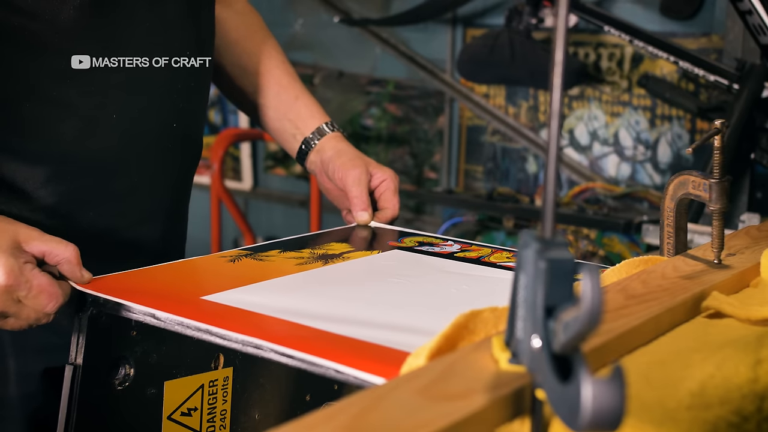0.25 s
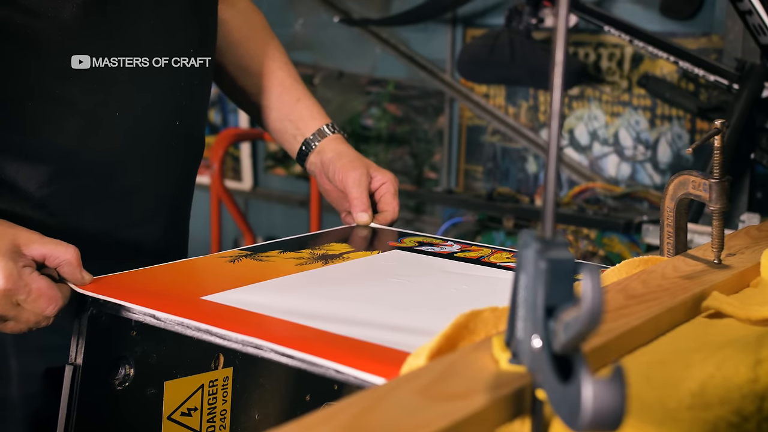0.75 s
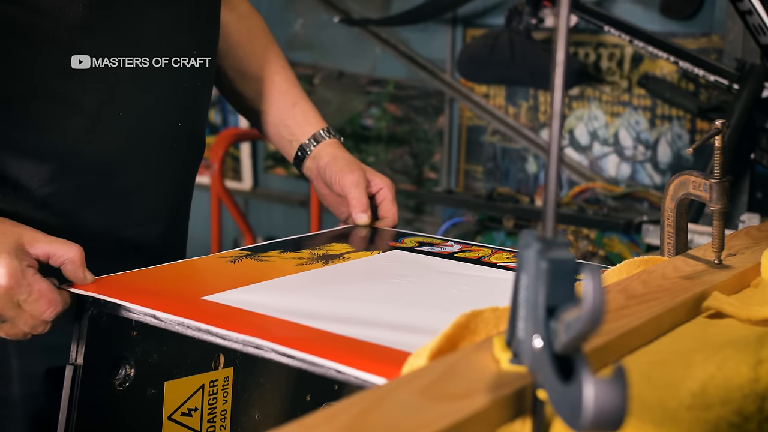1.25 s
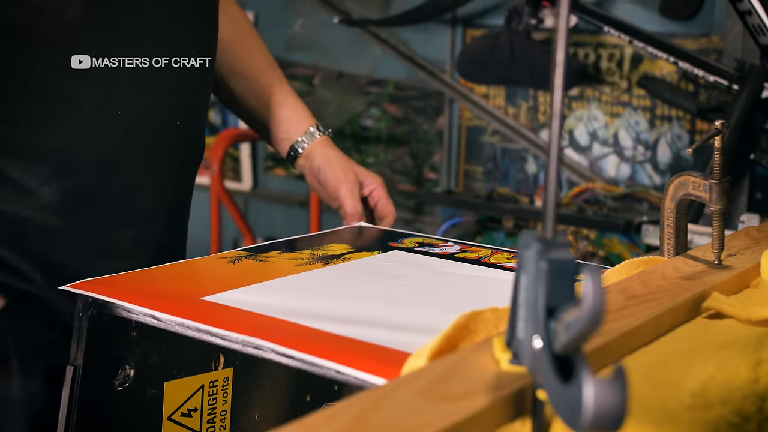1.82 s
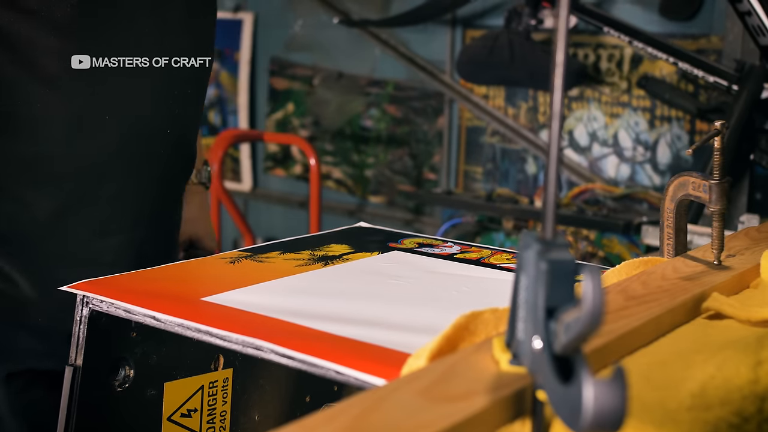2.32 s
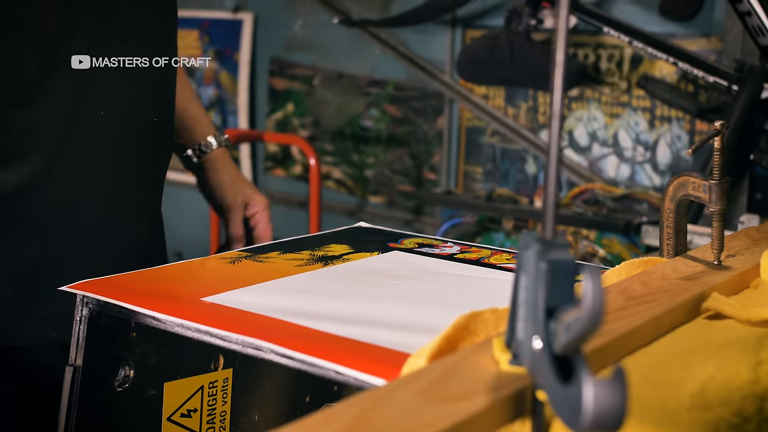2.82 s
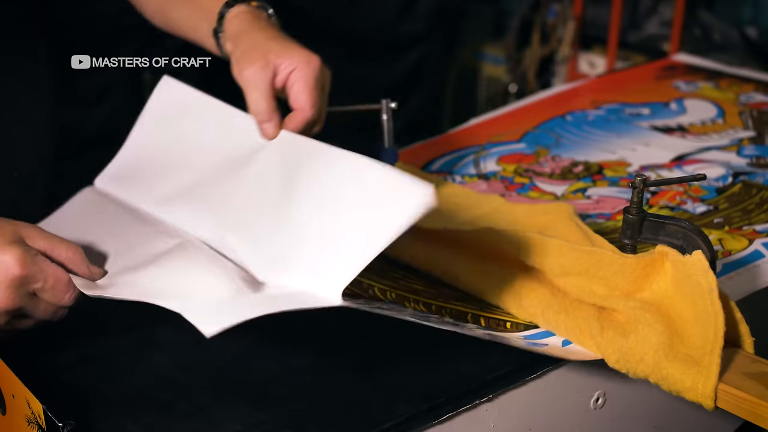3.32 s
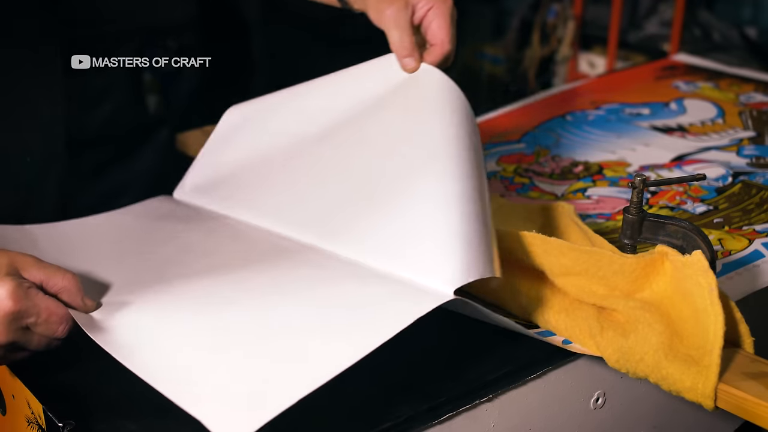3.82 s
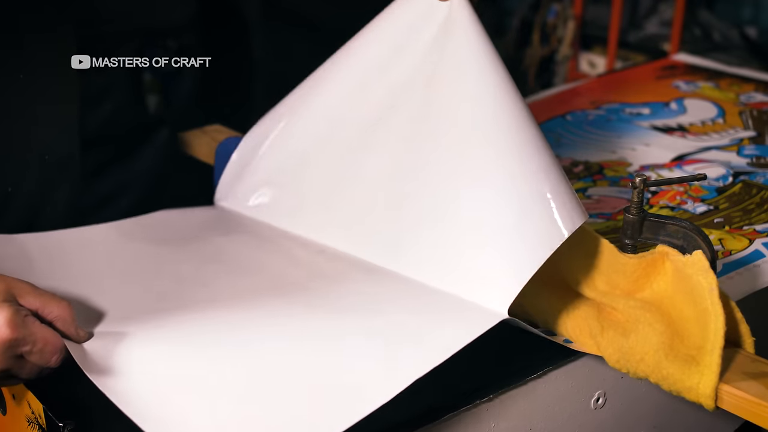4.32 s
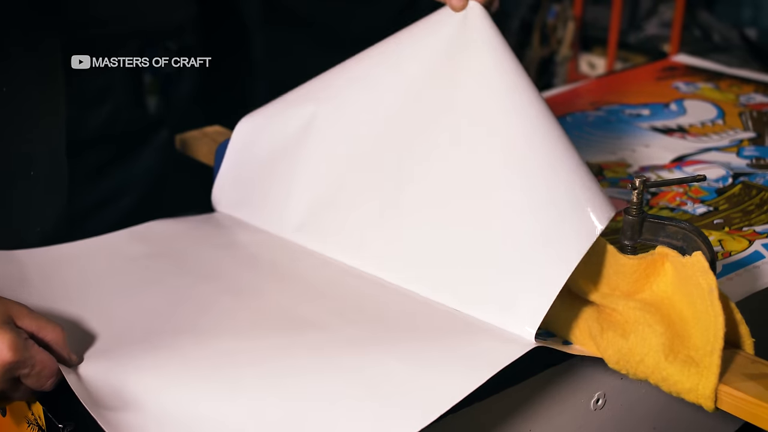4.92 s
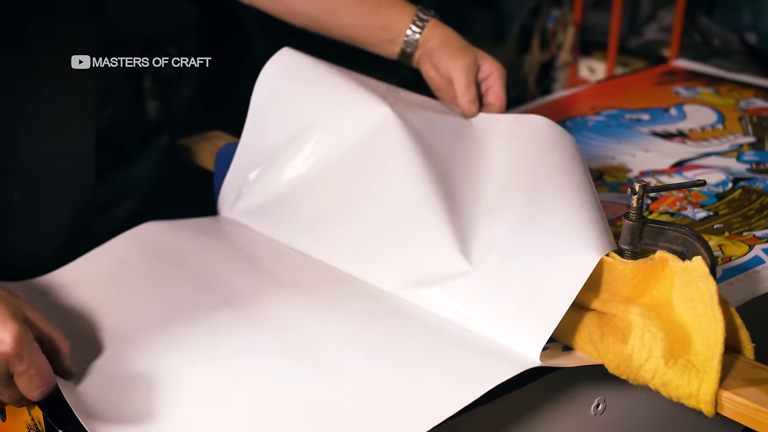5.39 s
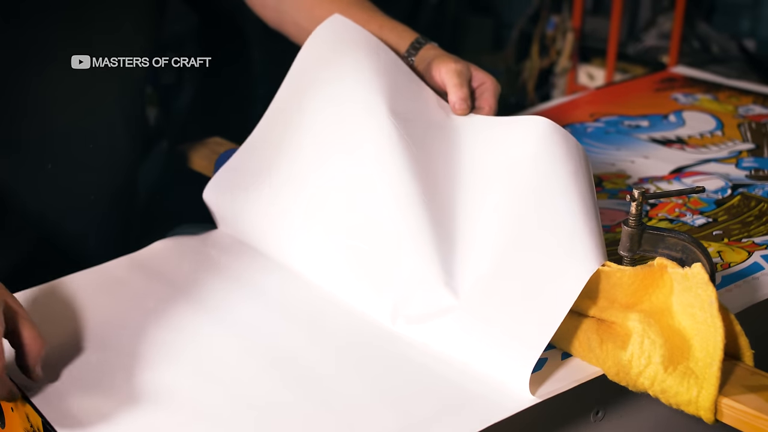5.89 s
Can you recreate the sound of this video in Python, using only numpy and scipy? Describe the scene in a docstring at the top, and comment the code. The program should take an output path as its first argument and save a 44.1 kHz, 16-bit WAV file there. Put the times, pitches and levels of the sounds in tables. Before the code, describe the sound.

In a small workshop, leaking air hisses with two tiny taps, then cuts to sharp paper creases, dull flaps and fading soft rustles.

```python
"""Stiff backing paper is pulled off a vinyl sheet in a small workshop, heard in mono through one microphone.
Before that, at a first spot, an air line hisses (echo-combed noise) over humming machines and something taps twice.
At the second spot creases snap, flaps buckle and ticks scatter: short noise bursts with a bench echo and a room tail,
lifted by the modes of the sheet. The rustle is grainy noise in two bands, the flexing sheet a low fluttering noise."""
import sys
import numpy as np
from scipy import signal
from scipy.fft import rfft, irfft
from scipy.io import wavfile
from scipy.ndimage import uniform_filter1d

SR = 44100
rng = np.random.default_rng(int(sys.argv[2]) if len(sys.argv) > 2 else 0)


def master_out(mix):
    """Clip the mix to full scale and print it as 16-bit PCM to the path in sys.argv[1]."""
    frames = np.transpose(np.atleast_2d(mix))
    ceiling = np.clip(frames, -1, 1)
    pcm = np.round(ceiling * 32767).astype(np.int16)
    wavfile.write(sys.argv[1], SR, pcm)


N = 271215
T = np.arange(N) / SR  # time [s]


def undb(db):
    """Decibels to amplitude."""
    return 10 ** (np.asarray(db) / 20)


def level(x, db):
    """Scale a sound to an RMS level [dB]."""
    return x * undb(db) / np.sqrt(np.mean(x ** 2))


def band(x, lo_hz, hi_hz, order=2):
    """Causal band-pass."""
    sos = signal.butter(order, [lo_hz, min(hi_hz, .45 * SR)], "band", fs=SR, output="sos")
    return signal.sosfilt(sos, x)


def colour(x, table, peaks=()):
    """Shape the spectrum by (frequency, level) points and add resonances (frequency, width, level)."""
    hz = np.maximum(np.arange(len(x) // 2 + 1) * SR / len(x), 1)
    table_hz, table_db = np.transpose(table)
    gain = undb(np.interp(np.log(hz), np.log(table_hz), table_db))
    lift = 1 + sum(undb(db) / (1 + (2 * (hz - f) / w) ** 2) for f, w, db in peaks)
    return irfft(rfft(x) * gain * lift, len(x))


def walk(rate):
    """Slow random wander: levels held 1 / rate s and smoothed twice, with a spread of about a third."""
    hold = int(SR / rate)
    steps = np.repeat(rng.standard_normal(N // hold + 1), hold)
    return 0.443 * uniform_filter1d(uniform_filter1d(steps, hold), hold)[:N]


def decay(t60, size):
    """Exponential decay that falls 60 dB in t60 seconds."""
    return np.exp(-np.log(1000) * np.arange(size) / SR / t60)


# air leak at the first spot: (time [s], level [dB])
LEAK = [(0.0, -31.5), (0.04, -33), (2.56, -32.5), (3.19, -34), (3.26, -40), (3.27, -58)]
# spectrum of the hiss: (frequency [Hz], relative level [dB per Hz])
LEAK_COLOUR = [(530, -54), (900, -23.5), (1370, -16), (1470, -18.5), (1870, -13), (2340, -17),
               (2770, -10.5), (3560, -6), (4310, -4), (5290, -6), (6640, -2), (9730, -5), (12400, 0),
               (15100, -10.5), (15700, -3.5)]
# standing waves around the leak: (frequency [Hz], width [Hz], level before the common offset [dB])
LEAK_PEAKS = [(3760, 43, -5), (4270, 87, -4), (5890, 44, -3), (6680, 85, -1), (6900, 29, -3),
              (7110, 42, -2), (7560, 58, -3), (7900, 130, -4), (8140, 160, -3), (9190, 80, -3),
              (9630, 70, -6), (9760, 71, -6), (10000, 58, -6), (10200, 43, -3), (10500, 42, -5),
              (10700, 68, -5), (11000, 42, -2), (11300, 67, -3), (11500, 26, -3), (12500, 63, 0),
              (13000, 30, -2), (13600, 53, -4), (13900, 180, -8), (14600, 120, -9)]
LEAK_PEAK_OFFSET_DB, LEAK_ECHO_T60_S = -3, 0.37


def leak():
    """A smooth jet of air; the echoes of the room comb it into fine fixed ridges."""
    echoes = 0.019 * rng.standard_normal(8192) * decay(LEAK_ECHO_T60_S, size=8192)
    echoes[0] = 1  # direct sound
    jet = signal.fftconvolve(rng.standard_normal(N), echoes)[:N]
    peaks = [(hz, width, db + LEAK_PEAK_OFFSET_DB) for hz, width, db in LEAK_PEAKS]
    hiss = level(colour(jet, LEAK_COLOUR, peaks), 0)
    s, db = np.transpose(LEAK)
    return hiss * undb(np.interp(T, s, db, right=-120) + .5 * walk(6.11))


# machine noise at the first spot: (frequency [Hz], relative level [dB per Hz])
SHOP_1 = [(15, -43), (25, -10), (70, -15), (89, -3.5), (156, -6.5), (234, -6.5), (276, -11), (303, -3.5),
          (377, -6), (406, -8.5), (445, 2.5), (479, -17.5), (596, -4.5), (642, -7), (2000, -14.5),
          (2600, -18), (4400, -120)]
# machine noise at the second spot: (frequency [Hz], relative level [dB per Hz])
SHOP_2 = [(25, -19.5), (60, -11), (130, -8), (250, -7), (400, -3), (700, -9), (1100, -11), (1800, -14.5),
          (2800, -24), (4300, -27.5), (6500, -39.5), (10000, -41), (15700, -39.5)]
SHOP_1_DB, SHOP_2_DB = -55.5, -54  # RMS before the cross-fade; the second also wanders
# humming parts of the machines:
# (frequency [Hz], width [Hz], level at first spot [dB], level at second spot [dB])
HUM = [(51.2, 1.1, -85, -69), (101.2, 4.4, -77.5, -71), (166.2, 21, -65, -72), (187, 5.8, -72.5, -62),
       (348, 8.4, -100, -63.5), (376, 6, -66, -61.5), (455.4, 44.5, -63.5, -69.5), (507, 8.3, -70.5, -70),
       (572, 5.4, -70.5, -78)]
MOVE_S, MOVE_LENGTH_S = 3.2, 0.21  # middle and length of the cross-fade between the spots


def shop():
    """Broad machine noise and wavering hums, cross-faded from one spot to the other."""
    second = np.clip((T - MOVE_S) / MOVE_LENGTH_S + .5, 0, 1)
    noise_1 = level(colour(rng.standard_normal(N), SHOP_1), SHOP_1_DB)
    noise_2 = level(colour(rng.standard_normal(N), SHOP_2), SHOP_2_DB) * undb(1.3 * walk(4.84))
    out = np.sqrt(1 - second) * noise_1 + np.sqrt(second) * noise_2
    for hz, width, db_1, db_2 in HUM:
        rough = level(band(rng.standard_normal(N), hz - width / 2, hz + width / 2, order=1), -3.5)
        drift = 0.145 * width * np.cumsum(walk(4)) / SR  # phase drift [cycles]
        steady = 0.78 * np.sin(2 * np.pi * (hz * T + drift + rng.random()))
        out += level(rough + steady, 0) * undb(db_1 + second * (db_2 - db_1))
    return out


# two faint taps at the first spot: (time [s], ring peak [dB], ring frequency [Hz])
TAPS = [(2.158, -33.5, 1520), (2.186, -45.5, 900)]
TAP_CRACK_DB, TAP_CRACK_HZ, TAP_THUMP_DB = -29.5, 6120, -49
TAP_T60_S, TAP_ROOM_DB = 0.033, 5.5


def taps():
    """Two taps as blows: (s, ring dB, ring Hz, crack dB, crack Hz, thump dB, ring t60 s, room dB)."""
    return [(s, ring, hz, TAP_CRACK_DB, TAP_CRACK_HZ, TAP_THUMP_DB, TAP_T60_S, TAP_ROOM_DB)
            for s, ring, hz in TAPS]


# the whole sheet lifts and flexes with a dull flutter: (time [s], level [dB])
FLEX = [(3.05, -72), (3.13, -56), (3.25, -47), (3.4, -48.5), (3.6, -56), (3.8, -75)]


def flex():
    """Low, fluttering noise of the big sheet bending."""
    s, db = np.transpose(FLEX)
    flutter = band(rng.standard_normal(N), 110, 1040) * undb(2.9 * walk(40))
    return level(flutter, 0) * undb(np.interp(T, s, db, left=-120, right=-120))


def crack_hz(ring_db, crack_db):
    """The crack is higher the fainter the ring and the more the crack leads the ring."""
    return 6120 - 57.5 * ring_db + 98 * (crack_db - ring_db)


# sharp creases letting go, peaks taken before the sheet's modes:
# (time [s], ring peak [dB], ring frequency [Hz], crack peak [dB], thump peak [dB])
CREASES = [(3.267, -11.5, 3100, -14.5, -31.5), (3.278, -23, 2600, -35, -30.5), (3.362, -7, 2700, -14, -44),
           (3.371, -33, 2320, -36, -53), (3.44, -3.5, 2140, -3.5, -35), (3.557, -22.5, 2110, -39, -31),
           (3.572, -28, 2900, -19.5, -39), (3.575, -32, 2280, -24, -35), (3.628, -40, 2250, -38, -58),
           (3.655, -20.5, 2860, -12, -36.5), (3.737, -35, 2020, -24, -37), (3.849, -52, 1910, -32, -43),
           (3.91, -38, 2160, -26, -54), (3.949, -25, 2270, -19.5, -52), (3.98, -17, 1950, -15.5, -29),
           (3.984, -16.5, 1700, -20.5, -36), (4.016, -29, 2340, -25, -56), (4.06, -39, 2850, -24, -39),
           (4.068, -25, 1600, -23, -42), (4.072, -31, 1460, -22, -55), (4.132, -29, 1600, -33, -30.5),
           (4.142, -20.5, 1880, -14.5, -41), (4.155, -24, 1770, -29, -39), (4.167, -27, 2170, -28, -44),
           (4.177, -21, 1510, -17, -56), (4.182, -13.5, 1500, -20, -33), (4.189, -18.5, 1180, -18, -38),
           (4.212, -30, 2150, -20, -34), (4.271, -24, 1970, -22, -58), (4.284, -46, 2020, -25, -47),
           (4.307, -25, 2020, -20, -55), (4.495, -51, 1870, -35.5, -57), (4.568, -38.5, 2280, -34, -54),
           (4.638, -11, 1790, -18, -34), (5.503, -41.5, 3300, -48.5, -62)]
CREASE_T60_S, CREASE_ROOM_DB = 0.0094, -2.5  # ring decay; room tail against the burst


def creases(table=CREASES):
    """Blows of sharp creases letting go, each with a very short ring."""
    return [(s, ring, hz, crack, crack_hz(ring, crack), thump, CREASE_T60_S, CREASE_ROOM_DB)
            for s, ring, hz, crack, thump in table]


# paper sliding and bending on vinyl: (time [s], body level [dB], treble level [dB])
RUSTLE = [(3.27, -40.5, -62), (3.458, -46, -70), (3.71, -58.5, -63), (3.906, -56.5, -62.5),
          (3.992, -58, -50), (4.128, -50, -61), (4.318, -49, -62), (4.38, -61, -71), (4.6, -66, -75),
          (4.908, -72, -82), (5.168, -56, -74), (5.32, -69, -75), (5.39, -62, -73), (5.73, -59, -70),
          (5.77, -63.5, -70), (5.928, -58, -62), (6.008, -57.5, -70), (6.03, -67, -79.5)]


def rustle():
    """Dense tiny slips of paper on vinyl, each with a short tail, in a body band and a treble band."""
    s, body_db, treble_db = np.transpose(RUSTLE)
    slips = undb(2.5 * rng.exponential(size=N)) * (rng.random(N) < .008)
    slip_power = signal.fftconvolve(slips, decay(0.0074, size=1024))[:N].clip(0)
    grain = np.sqrt(1 + 0.14 * slip_power)
    out = 0
    for lo_hz, hi_hz, db in ((900, 3270, body_db), (3940, 9900, treble_db)):
        slide = band(grain * rng.standard_normal(N), lo_hz, hi_hz)
        out = out + level(slide, 0) * undb(np.interp(T, s, db, left=-120) + 0.79 * walk(5))
    return out


# dull flaps and buckles of the loose sheet, peaks taken before the sheet's modes:
# (time [s], ring peak [dB], ring frequency [Hz], thump peak [dB], ring t60 [s])
FLAPS = [(3.299, -25.5, 1470, -28, 0.041), (3.352, -21, 2510, -24.5, 0.055), (4.61, -37, 905, -55, 0.02),
         (4.807, -31.5, 1740, -35.5, 0.046), (4.915, -37, 890, -43, 0.016), (4.93, -29, 1060, -39.5, 0.042),
         (5.129, -29, 910, -28.5, 0.052), (5.222, -38, 1010, -40, 0.043), (5.594, -35, 1230, -50, 0.02),
         (5.634, -37, 990, -43, 0.012), (5.741, -41, 1340, -47, 0.016), (5.78, -42, 890, -47, 0.01)]
FLAP_CRACK_DB, FLAP_CRACK_HZ, FLAP_ROOM_DB = -27, 4800, -3.5  # crack against the ring; room


def flaps():
    """Blows of the loose sheet flapping and buckling, with little crack and a longer ring."""
    return [(s, ring, hz, ring + FLAP_CRACK_DB, FLAP_CRACK_HZ, thump, t60, FLAP_ROOM_DB)
            for s, ring, hz, thump, t60 in FLAPS]


TICK_START_S, TICK_END_S, TICK_HZ = 3.78, 3.94, 2100
TICK_DB, TICK_SPREAD_DB = -43, 9  # mean crack peak and its full range
TICK_RING_DB, TICK_THUMP_DB = -4, -70  # ring against the mean crack; thump peak


def ticks():
    """Eight faint ticks scattered at random while the backing comes away, played as small creases."""
    rows = []
    for _ in range(8):
        s = rng.uniform(TICK_START_S, TICK_END_S)
        crack = TICK_DB + TICK_SPREAD_DB * (rng.random() - .5)
        rows.append((s, TICK_DB + TICK_RING_DB, TICK_HZ, crack, TICK_THUMP_DB))
    return creases(rows)


# decay of the small room: (frequency [Hz], t60 [s])
ROOM = [(300, 0.45), (800, 0.38), (2000, 0.25), (5500, 0.26), (12000, 0.12)]


def room_tail(size):
    """A diffuse tail with its own decay in each band; it builds up over the first milliseconds."""
    tail = 0
    for hz, t60 in ROOM:
        # single echoes and after-crackle of the paper make it grainy
        steps = np.repeat(rng.standard_normal(size // 128), 128)
        grain = undb(2.4 * uniform_filter1d(steps, 64))
        tail = tail + band(grain * rng.standard_normal(size), hz / 1.56, hz * 1.77) * decay(t60, size)
    tail *= 1 - decay(0.01, size)
    return tail / np.sqrt(np.sum(tail ** 2))


BENCH_ECHO_S, BENCH_ECHO_DB = 0.0044, -9
NEEDLE_DB, NEEDLE_S = 9.5, 0.019  # first click before it fades with length; longer bursts lose it


def blows(rows):
    """Each blow is a burst of three bands: a ring, a treble crack and a thump of air."""
    size, lag = 16384, int(BENCH_ECHO_S * SR)
    out = np.zeros(N + 2 * size)
    for s, ring_db, ring_hz, crack_db, crack_mid_hz, thump_db, ring_t60, room_db in rows:
        shapes = ((ring_hz / 2.22, ring_hz * 1.47, ring_t60, ring_db),
                  (crack_mid_hz / 2.63, crack_mid_hz * 1.43, 0.63 * ring_t60, crack_db),
                  (180, 850, 0.022 + ring_t60, thump_db))
        direct, echo, wet, tail = 0, 0, 0, room_tail(size)
        for lo_hz, hi_hz, t60, db in shapes:
            # a slow flap swells in, a sharp crease starts almost at once
            swell = 1 - decay(14 * t60 ** 2, size)
            push = (decay(t60, size) + 0.75 * decay(0.29 * t60, size)) * swell
            shake = rng.standard_normal((2, size)) * push
            shake[:, 0] = undb(NEEDLE_DB) * np.exp(-(t60 / NEEDLE_S) ** 2)
            burst, again = band(shake, lo_hz, hi_hz)
            gain = undb(db) / np.abs(burst).max()
            direct = direct + gain * burst
            echo = echo + gain * again
            # every crease sits elsewhere, so each tail is new but keeps the band and energy of its burst
            part = band(tail, lo_hz / 1.21, hi_hz * 1.19)
            wet = wet + gain * np.sqrt(np.sum(burst ** 2) / np.sum(part ** 2)) * part
        i = int(s * SR)
        out[i:i + size] += direct + undb(room_db) * wet
        out[i + lag:i + lag + size] += undb(BENCH_ECHO_DB) * echo  # the bench top sends it back once
    return out[:N]


# modes of the stiff sheet: (frequency [Hz], width [Hz], level [dB])
SHEET = [(740, 330, -15), (1590, 200, -18), (2450, 480, -21), (3780, 930, -19.5)]


def sheet(x):
    """The sheet lifts its own modes out of whatever shakes it."""
    modes = sum(undb(db) * band(x, hz - width / 2, hz + width / 2, order=1) for hz, width, db in SHEET)
    return 0.78 * x + modes


def scene():
    """Everything reaches the one microphone; both channels are the same."""
    struck = sheet(blows(taps() + creases() + flaps() + ticks()))  # the taps pass the modes too
    mono = leak() + shop() + struck + flex() + rustle()
    return np.array([mono, mono])


def record(dry):
    """The recorder rounds peaks near full scale and cuts the top above 15750 Hz."""
    rounded = dry / (1 + (dry / .9) ** 6) ** (1 / 6)
    return signal.sosfilt(signal.ellip(10, .2, 75, 15750, fs=SR, output="sos"), rounded)


dry = scene()
out = record(dry)
master_out(out)
```